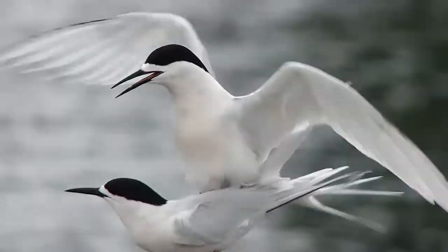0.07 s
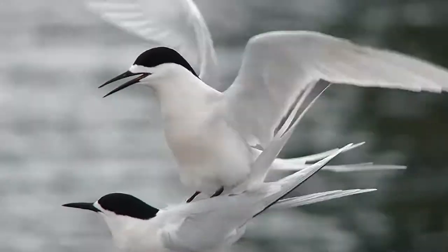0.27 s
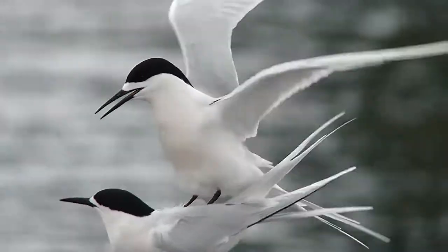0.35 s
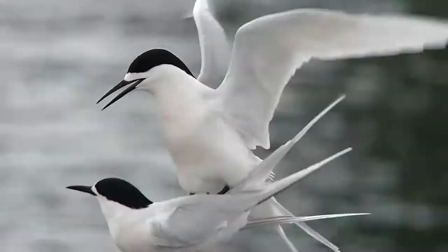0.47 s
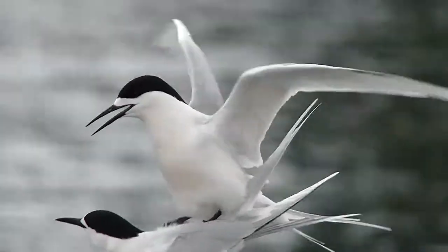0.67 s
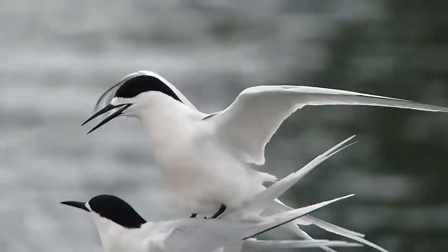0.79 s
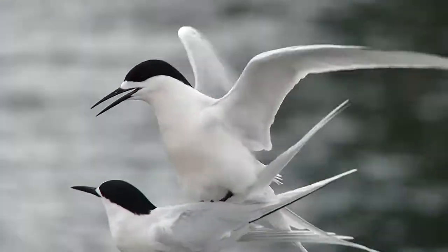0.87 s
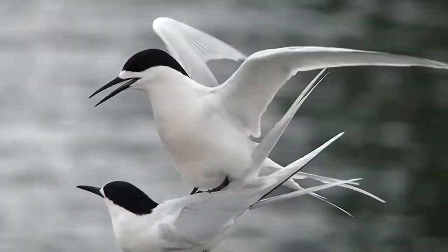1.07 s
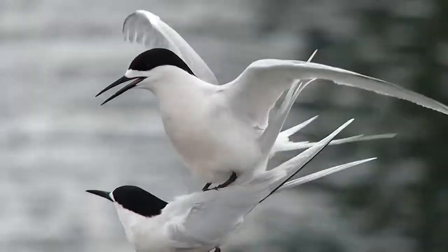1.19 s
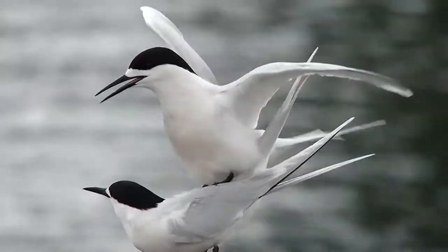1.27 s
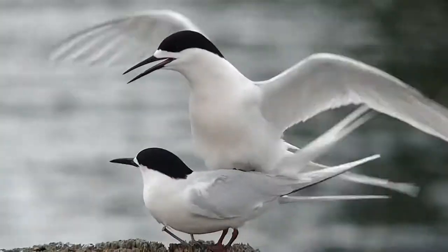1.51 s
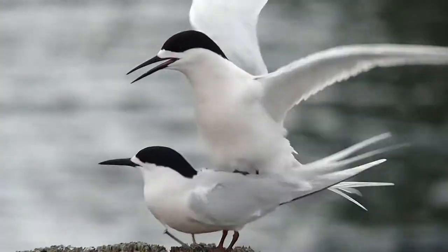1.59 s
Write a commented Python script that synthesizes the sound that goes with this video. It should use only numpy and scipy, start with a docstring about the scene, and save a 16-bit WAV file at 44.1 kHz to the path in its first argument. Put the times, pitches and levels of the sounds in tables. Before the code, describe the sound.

A tern close by gives a steady row of harsh, dry kek calls beside the water

```python
"""A near tern chatters a steady row of harsh keks, made of throat pulses chopped into bursts.
Others give stuttered chips of jumping notes, rasps of harsh pulses and a falling whistle. A nasal cry,
a rattle, a held far note, a low hoot and a faint hum are stacks of partials or single tones.
Shore and water return a short wash of decaying noise; wind, water and the far colony are noise
bands that swell and flicker. The microphone pair is almost mono."""
import sys
import numpy as np
from scipy import signal
from scipy.fft import rfft, irfft
from scipy.io import wavfile
from scipy.ndimage import uniform_filter1d

SR = 44100
rng = np.random.default_rng(int(sys.argv[2]) if len(sys.argv) > 2 else 0)


def convert_level_to_amplitude(level_db):
    """Map a level in decibels to its linear amplitude factor."""
    exponent = np.asarray(level_db, float) / 20
    return 10 ** exponent


def put_to_file(sound):
    """Save the sound as 16-bit audio at rate SR, in the file named by the first command-line argument."""
    columns = np.atleast_2d(sound).T  # one column per channel
    safe = np.clip(columns, -1, 1)
    whole_steps = np.round(safe * 32767)
    wavfile.write(sys.argv[1], SR, whole_steps.astype(np.int16))


N = 72765


def col(rows, k, x):
    """Reads column k of a table at x, with straight lines between rows."""
    rows = np.array(rows, float)
    return np.interp(x, rows[:, 0], rows[:, k])


def tone_db(rows, hz):
    """Reads a (pitch_hz, level_db) table along a logarithmic pitch axis."""
    return col([(np.log(f), db) for f, db in rows], 1, np.log(np.maximum(hz, 1)))


def unit(x):
    """Scales a sound to an rms of 1."""
    return x / np.sqrt(np.mean(x ** 2))


def band(x, hz, width):
    """Two-pole resonance, gain 1 at the centre."""
    return signal.lfilter(*signal.iirpeak(hz, hz / width, SR), x)


def steep_band(x, hz, width):
    """The same resonance twice in a row, so its sides fall more steeply."""
    return band(band(x, hz, width), hz, width)


def walk(rate):
    """Smooth chance with rms 1, made from rate random values a second."""
    k = max(int(SR / rate), 1)
    steps = np.repeat(rng.standard_normal(N // k + 1), k)
    return unit(uniform_filter1d(uniform_filter1d(steps, k), k)[:N])


def voice(curve, orders, waver, flicker_db, colour=None, bend=0, rough=0):
    """Partials on a pitch and level curve; the pitch wavers, each partial flickers, higher ones turn noisy."""
    t = np.arange(N) / SR
    hz = col(curve, 1, t) * (1 + waver * walk(300) + bend)
    phase = 2 * np.pi * np.cumsum(hz) / SR
    out = 0
    for k, db in orders:
        if colour:
            db = db + tone_db(colour, k * hz)
        strength = convert_level_to_amplitude(db + flicker_db * walk(150)) * (1 + rough * k * walk(1800))
        out = out + strength * np.sin(k * phase + k * k)
    edge = np.clip(np.minimum(t - curve[0][0], curve[-1][0] - t) / 0.0044, 0, 1)
    return np.sqrt(2) * out * convert_level_to_amplitude(col(curve, 2, t)) * edge


def ring(x, table):
    """Steep resonances side by side; each drifts in strength as the throat shifts."""
    out = 0
    for k, (hz, width, db) in enumerate(table):
        gain = convert_level_to_amplitude(db + 1.3 * walk(13.94))
        out = out + (-1) ** k * gain * steep_band(x, hz, width)
    return out


def add(out, s, size):
    """Clicks at the times s, each shared between two samples."""
    at = s[s < N / SR - .001] * SR
    np.add.at(out, at.astype(int), size[:len(at)] * (1 - at % 1))
    np.add.at(out, at.astype(int) + 1, size[:len(at)] * (at % 1))


def shore():
    """Wind, water and far birds: third-octave bands that swell together and flicker alone."""
    # tone of the background noise, before the overall level is set (pitch_hz, level_db per Hz)
    tone = [(15, -70), (25, -33), (70, -25), (170, -6.5), (350, -1.5), (900, -1), (1350, -6.5), (2230, -6),
            (2700, -12.5), (3100, -8.5), (3720, -12), (4870, -8.5), (6210, -23.5), (7700, -25),
            (10400, -34), (12500, -37), (15500, -45)]
    # how far the left-right difference lies under the middle (pitch_hz, level_db)
    side_under_mid = [(25, -11), (125, -23.5), (500, -29.5), (1500, -32.5), (4000, -38), (12000, -14)]
    mid, side, swell = 0, 0, walk(0.67)
    f = np.fft.rfftfreq(N, 1 / SR)
    tilt = convert_level_to_amplitude(tone_db(tone, f))
    mid_noise = rfft(rng.standard_normal(N)) * tilt
    side_noise = rfft(rng.standard_normal(N)) * tilt * convert_level_to_amplitude(tone_db(side_under_mid, f))
    for hz in 20 * 2 ** (np.arange(30) / 3):
        part = np.cos(np.pi / 2 * np.clip(3 * np.log2(np.maximum(f, 1) / hz), -1, 1)) ** 2
        gain = convert_level_to_amplitude(0.78 * swell + 1.3 * walk(12.13))
        mid = mid + gain * irfft(mid_noise * part, N)
        side = side + gain * irfft(side_noise * part, N)
    level = convert_level_to_amplitude(-39) / np.sqrt(np.mean(mid ** 2))  # the middle ends at -39 dB rms
    return level * np.array([mid + side, mid - side])


def surroundings(x, wet_db, pan_db):
    """Direct sound, left over right by pan_db, plus a decaying noise wash slightly different left and right."""
    base_db, t60_s, rise_s, top_hz = -7.5, 0.28, .009, 7100  # wet_db adds to base_db
    u = np.arange(SR // 2) / SR
    fade = convert_level_to_amplitude(-60 * u / t60_s) * (1 - np.exp(-u / rise_s))
    shape = convert_level_to_amplitude(base_db) * fade * np.sqrt(14.2 / t60_s / SR)
    mid, side = shape * rng.standard_normal((2, len(u)))
    sos = signal.butter(1, top_hz, fs=SR, output="sos")
    wet = []
    for sign in (1, -1):
        echo = signal.sosfilt(sos, mid + sign * convert_level_to_amplitude(-33.5) * side)
        wet.append(signal.fftconvolve(x, echo)[:N])
    direct = x * convert_level_to_amplitude(np.array([[.5], [-.5]]) * pan_db)
    return direct + convert_level_to_amplitude(wet_db) * np.array(wet)


def hum():
    """A faint hum sets in: one slightly wavering tone."""
    # path of the hum (time_s, pitch_hz, level_db)
    curve = [(1.4, 441, -50), (1.65, 441, -53)]
    return voice(curve, [(1, 0)], 0.0017, 0.99)


def low_hoot():
    """A short falling hoot: one wavering low tone."""
    # path of the hoot; it sounds at 0.94 of this pitch (time_s, pitch_hz, level_db)
    curve = [(1.145, 560, -54), (1.168, 510, -38), (1.19, 470, -52)]
    return voice(curve, [(0.94, 0)], 0.009, 1.7)


def far_note():
    """A held far note: one high tone roughened by fast chance changes in level."""
    # path of the note (time_s, pitch_hz, level_db)
    curve = [(.94, 4920, -41), (.98, 5010, -44), (.992, 5030, -35.5), (1.012, 4850, -37.5),
             (1.022, 4700, -47)]
    return voice(curve, [(1, 0)], 0.00756, 3, rough=.35)


def rattle():
    """A harsh stack of partials switched on and off in bursts that each sag in pitch."""
    # path of the pitch and level before the bursts and tone (time_s, pitch_hz, level_db)
    curve = [(1.0, 1014, -45), (1.015, 978, -36.5), (1.035, 936, -39), (1.065, 898, -35.5),
             (1.125, 858, -38), (1.15, 826, -52)]
    # tone of the partials (pitch_hz, level_db)
    colour = [(900, -11.5), (1750, -5.5), (1950, 5), (2700, -2.5), (3700, -7), (4750, -8), (5400, 6),
              (5900, -11), (7300, -14.5), (8300, -19), (9300, -29)]
    bursts_hz, first_s, open_share, sag_share = 61, 1.009, 0.99, .03
    cycle = ((np.arange(N) / SR - first_s) * bursts_hz + .04 * walk(40)) % 1  # slightly uneven timing
    partials = [(k, 0) for k in range(1, 11)]
    x = voice(curve, partials, .01, 2.2, colour, bend=sag_share * (.3 - cycle), rough=.08)
    return x * np.sin(np.pi * np.clip(cycle / open_share, 0, 1))


def cry():
    """A nasal falling cry: twelve partials whose tone is strong in some regions and weak in others."""
    # path of the cry before its tone (time_s, pitch_hz, level_db)
    curve = [(.843, 935, -51), (.852, 986, -42.5), (.868, 1003, -42.5), (.886, 928, -36.5),
             (.91, 871, -36.5), (.936, 808, -39), (.965, 720, -46.5)]
    # tone of the partials (pitch_hz, level_db)
    colour = [(780, -8), (970, 4), (1900, -3), (2700, -2), (3800, -16), (5000, -5), (6300, -18), (7600, -7),
              (9500, -12), (11500, -28)]
    return voice(curve, [(k, 0) for k in range(1, 13)], 0.0052, 0.99, colour, rough=.07)


def whistle():
    """A falling whistle: three partials, each flickering and a little noisy."""
    # path of the whistle before its tone (time_s, pitch_hz, level_db)
    curve = [(.5, 4790, -35), (.51, 4710, -31), (.536, 4690, -34.5), (.56, 4447, -33.5), (.59, 4304, -34.5),
             (.63, 4186, -36), (.675, 4085, -41), (.715, 4040, -54)]
    # tone of the partials (pitch_hz, level_db)
    colour = [(4800, 4), (8200, -6), (9500, -9.5), (12400, -25), (13400, -29), (14200, -54)]
    return voice(curve, [(k, 0) for k in range(1, 4)], 0.0012, 1.7, colour, rough=.2)


def rasps():
    """Irregular pulses and noise through one wide resonance, with a treble skirt; a lone tick."""
    # harsh pulse bursts; width is that of each of two passes (start_s, length_s, centre_hz, level_db, width_hz)
    bursts = [(0.288, 0.013, 4480, -21.5, 2500), (0.299, 0.014, 4000, -20, 2440),
              (0.629, 0.046, 4900, -33.5, 1490), (1.381, 0.033, 4600, -32.5, 1170),
              (1.415, 0.004, 4880, -28.5, 500), (1.42, 0.05, 4900, -35.5, 800)]
    # faint tick (start_s, level_db)
    ticks = [(1.318, -40)]
    out, t = np.zeros(N), np.arange(N) / SR
    pulses = rng.random(N) < 1800 / SR  # about 1800 a second, at random
    grit = unit(rng.standard_normal(N) * (1.35 + 4 * pulses))
    for s, length, hz, db, width in bursts:
        x = grit * np.clip((t - s) / 0.0025, 0, 1) * np.exp(-np.maximum(t - s - length, 0) / 0.0075)
        body = steep_band(x, hz, width) * np.sqrt(SR / 3 / width)
        out += convert_level_to_amplitude(db) * (body + convert_level_to_amplitude(-20.5) * steep_band(x, 8200, 8000))
    for s, db in ticks:
        x = grit * (t > s) * np.exp(-np.maximum(t - s, 0) / 0.001)
        out += convert_level_to_amplitude(db) * (3 * band(x, 1500, 1200) + 0.12 * band(band(x, 8500, 5000), 8500, 4300))
    return out


def chips():
    """Short clear notes that jump between pitches, each with its octave, a noisy click and some hiss."""
    # notes; the octave level is relative to the note
    # (start_s, length_s, start_pitch_hz, end_pitch_hz, level_db, octave_level_db)
    notes = [(0.229, 0.0045, 3130, 3300, -20.5, -11), (0.2378, 0.0054, 4940, 4740, -15, -11),
             (0.2457, 0.0069, 5230, 4930, -14, -6), (0.2505, 0.0099, 3250, 4030, -15.5, -12),
             (0.2593, 0.0059, 5070, 4740, -11, -10), (0.263, 0.006, 3770, 3750, -14, -18),
             (0.2656, 0.0212, 5090, 4720, -12, -12), (0.2864, 0.011, 3260, 3670, -17, -12),
             (0.291, 0.011, 4650, 3950, -19, -9), (1.324, 0.0067, 4900, 4750, -33, -5.5),
             (1.332, 0.0098, 4910, 4880, -32, -5.5), (1.343, 0.0105, 4950, 4680, -32, -2),
             (1.353, .025, 4960, 4620, -31.5, -1), (1.378, 0.0062, 3370, 3300, -29.5, -23),
             (1.381, 0.012, 4610, 4220, -34, -7), (1.395, 0.011, 4330, 3360, -34.5, -16)]
    edge_s, breath_db, click_db = 0.0027, -42, -17
    out = np.zeros(N)
    air = unit(band(band(rng.standard_normal(N), 8700, 7800), 9500, 6300))
    for s, length, hz0, hz1, db, octave_db in notes:
        u = np.arange(int(length * SR)) / SR
        overshoot = 1 + 0.028 * np.exp(-(u / 0.0026 - 1) ** 2)  # the pitch arches up early in the note
        phase = 2 * np.pi * np.cumsum((hz0 + (hz1 - hz0) * u / length) * overshoot) / SR
        edge = np.sin(np.pi / 2 * np.clip(np.minimum(u, length - u) / edge_s, 0, 1)) ** 2
        i = int(s * SR)
        hiss = air[i:i + len(u)] * (convert_level_to_amplitude(breath_db) * edge + convert_level_to_amplitude(click_db) * np.exp(-u / 0.0043))
        tone = edge * (np.sin(phase) + convert_level_to_amplitude(octave_db) * np.sin(2 * phase + 1)) * np.sqrt(2)
        out[i:i + len(u)] += convert_level_to_amplitude(db) * (tone + hiss)
    return out


def breathy(x, air):
    """Adds hiss that lasts about 40 samples after each pulse."""
    return x + uniform_filter1d(x, size=40, origin=19) * air


def keks():
    """Uneven pulses, chopped into bursts, ring the throat; the treble fades through the call."""
    # calls; pitch is the third partial at the start, levels are before the throat
    # (start_s, level_db, third_partial_hz, length_s, treble_level_db)
    calls = [(0.0278, -18.5, 2339, 0.056, 0), (0.172, -18.5, 2287, 0.044, -2.5),
             (0.2984, -19.5, 2253, 0.033, -14), (0.4336, -23, 2320, 0.036, 2.5),
             (0.553, -21, 2388, 0.033, 0), (0.68, -20.5, 2332, 0.038, -1),
             (0.8069, -20.5, 2333, 0.053, 2.5), (0.9393, -20, 2283, 0.054, 4),
             (1.0714, -19.5, 2268, 0.058, -5.5), (1.2091, -21.5, 2268, 0.031, -0.5),
             (1.341, -20.5, 2249, 0.046, -0.5), (1.474, -21, 2157, 0.043, 0.5),
             (1.605, -20, 2203, 0.055, 2)]
    # throat resonances; width is that of each of two passes (centre_hz, width_hz, level_db)
    throat = [(1646, 610, -16), (2259, 624, 0.5), (3167, 616, -3), (4000, 410, -9.5), (4850, 720, -6)]
    # treble resonances, same layout (centre_hz, width_hz, level_db)
    treble = [(7550, 1250, -14.5), (10540, 2300, -26.5), (13000, 2800, -42)]
    flutter_hz, open_share, opening_s = 93.3, .65, .0045  # burst rate, open share, length of the opening burst
    opening_gap_db, later_gap_db = -17, -5  # level between bursts
    rise_s, fall_s, start_share = .02, .011, .6
    fade_db_s, treble_fade_db_s = -90, -120  # dB a second; the treble fade comes on top
    drive, bright, count = np.zeros(N), np.zeros(N), 80
    chance = rng.standard_normal((len(calls), 3, count))
    for (s, db, third_hz, length, treble_db), (gap, strength, burst) in zip(calls, chance):
        period = 3 / third_hz * (1 + 0.04006 * np.arange(count) / 40)  # the pitch sags pulse by pulse
        u = np.cumsum(period) - period[0] + .04 * period * gap * (np.arange(count) > 0)
        # bursts of uneven length, the first one cut short
        turns = np.cumsum(1 + .18 * np.clip(burst[::-1], -2, 2)) / flutter_hz
        borders = np.r_[0, 1 / flutter_hz, 1 / flutter_hz + turns[:-2]]
        cycle = np.interp(u - (opening_s - open_share / flutter_hz), borders, np.arange(count))
        gap_db = np.where(cycle < 1, opening_gap_db, later_gap_db)
        gate = convert_level_to_amplitude(np.where(cycle % 1 < open_share, 0, gap_db))
        swell = np.interp(u, [0, rise_s], [start_share, 1])
        swell = swell * convert_level_to_amplitude(fade_db_s * np.maximum(u - rise_s, 0))
        swell = swell * np.exp(-np.maximum(u - length, 0) / fall_s)
        # chance differences between pulses and between bursts
        size = convert_level_to_amplitude(db + 2.2 * strength + 0.86 * burst[cycle.astype(int)]) * gate * swell
        add(drive, s + u, size)
        add(bright, s + u, size * convert_level_to_amplitude(treble_db + treble_fade_db_s * u))
    air = rng.standard_normal(N) * np.sqrt(40) * convert_level_to_amplitude(-8.5)
    return convert_level_to_amplitude(22) * (ring(breathy(drive, air), throat) + ring(breathy(bright, air), treble))


def scene():
    """Gives each group of birds its wash and place, and adds the shore."""
    far = cry() + rattle() + far_note() + low_hoot() + hum()
    out = shore()
    out = out + surroundings(far, wet_db=4.5, pan_db=0.5)
    out = out + surroundings(whistle(), wet_db=4.5, pan_db=1.0)
    out = out + surroundings(chips() + rasps(), wet_db=3.0, pan_db=-.45)
    return out + surroundings(keks(), wet_db=2.7, pan_db=0.22)


def top_cut(x):
    """Nothing passes above the cut-off."""
    return signal.sosfilt(signal.butter(12, 15970, fs=SR, output="sos"), x)


def record(dry):
    """The microphone dulls the top, then a steep filter sets the band edge."""
    dull = signal.sosfilt(signal.butter(2, 13100, fs=SR, output="sos"), dry)
    mix = signal.sosfilt(signal.ellip(8, .2, 70, 15700, fs=SR, output="sos"), dull)
    return top_cut(mix)


dry = scene()
out = record(dry)
put_to_file(out)
```